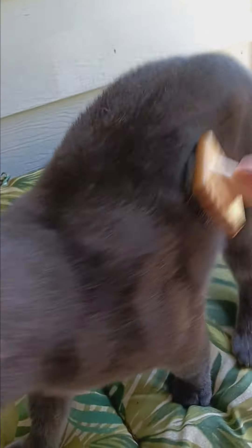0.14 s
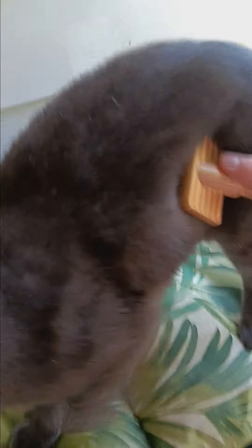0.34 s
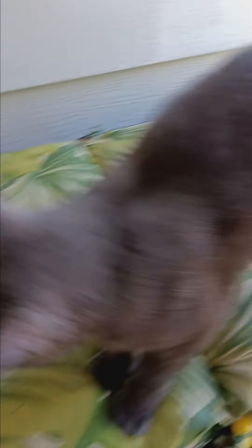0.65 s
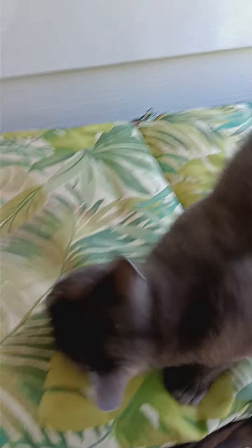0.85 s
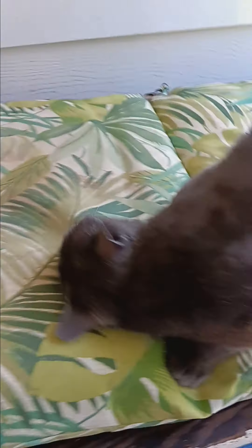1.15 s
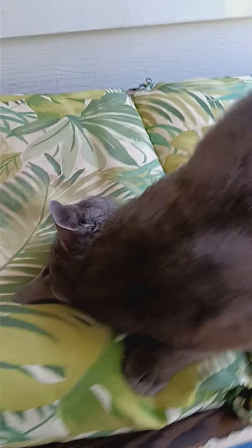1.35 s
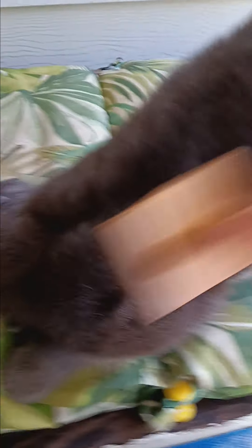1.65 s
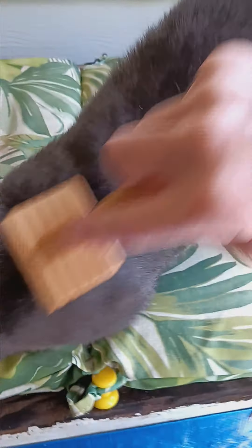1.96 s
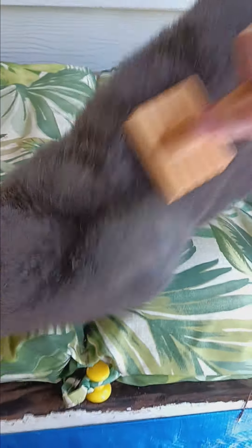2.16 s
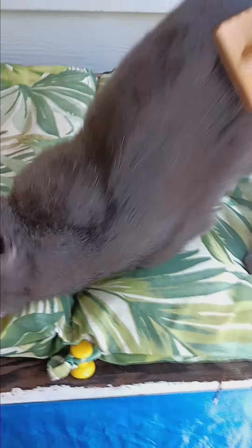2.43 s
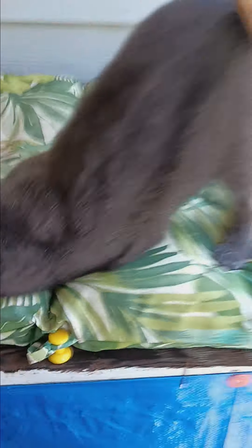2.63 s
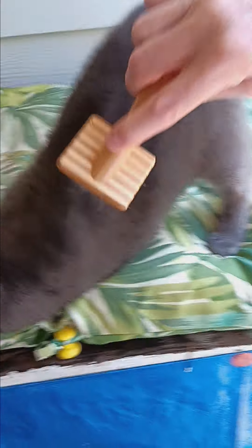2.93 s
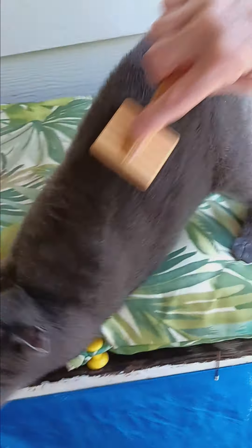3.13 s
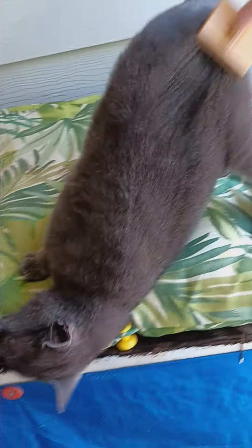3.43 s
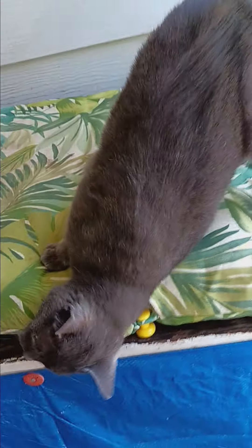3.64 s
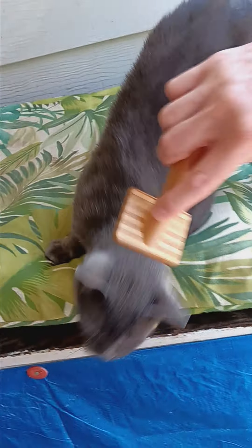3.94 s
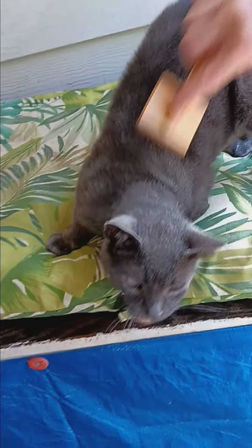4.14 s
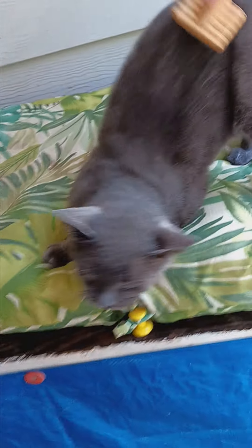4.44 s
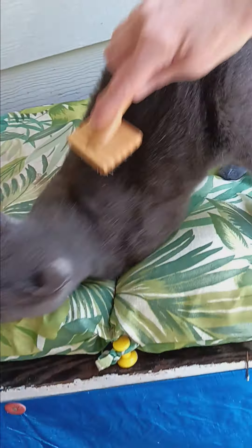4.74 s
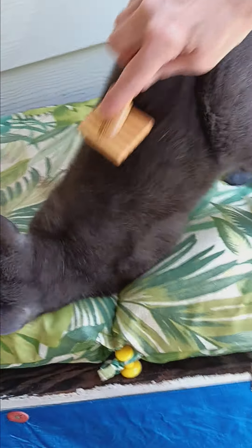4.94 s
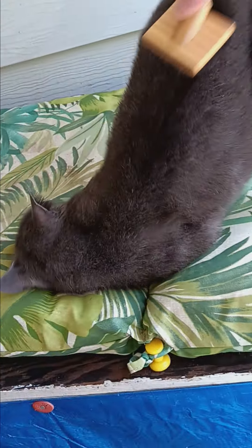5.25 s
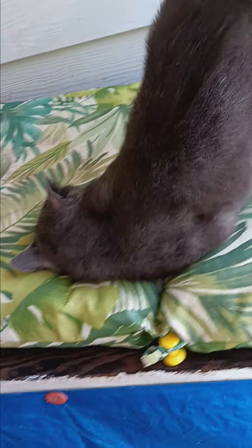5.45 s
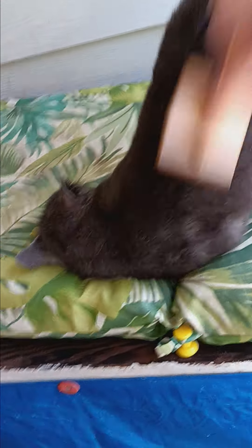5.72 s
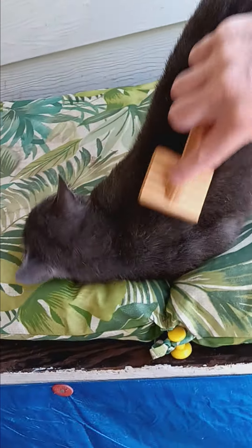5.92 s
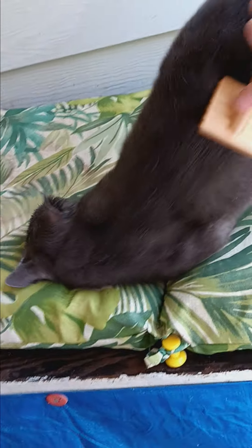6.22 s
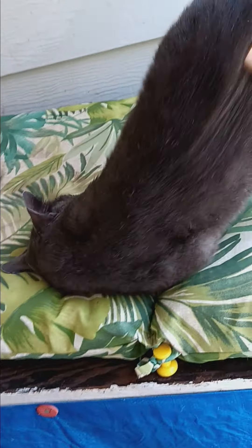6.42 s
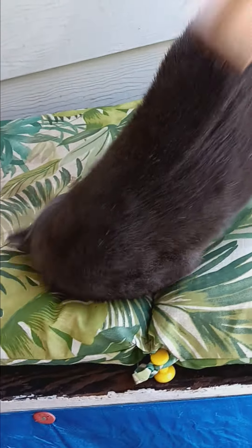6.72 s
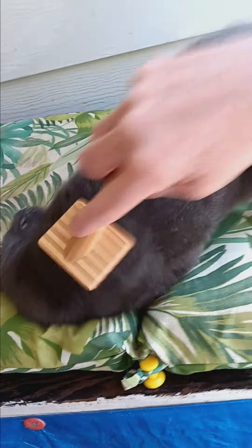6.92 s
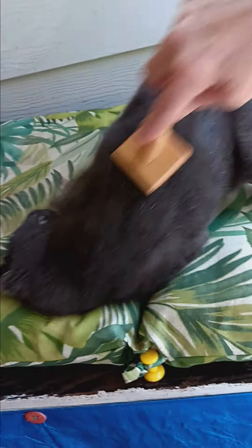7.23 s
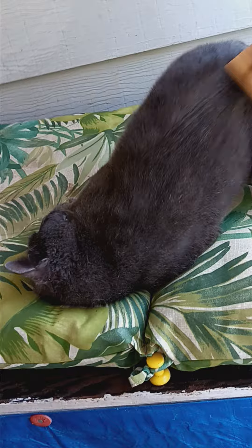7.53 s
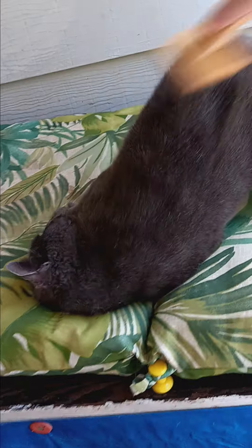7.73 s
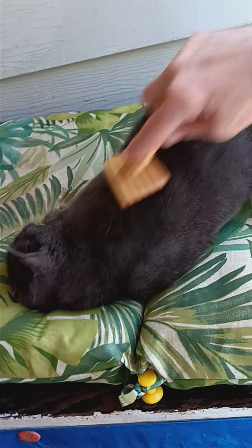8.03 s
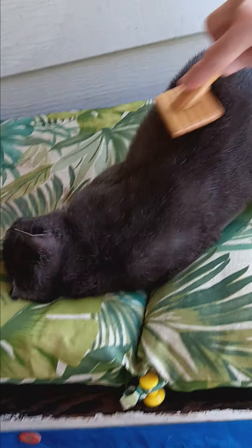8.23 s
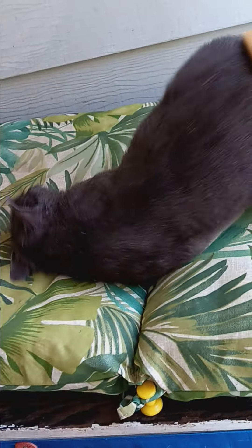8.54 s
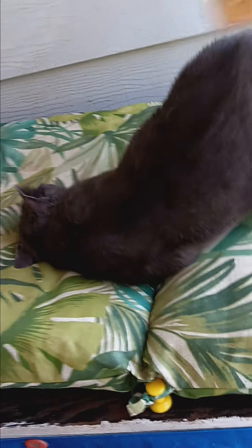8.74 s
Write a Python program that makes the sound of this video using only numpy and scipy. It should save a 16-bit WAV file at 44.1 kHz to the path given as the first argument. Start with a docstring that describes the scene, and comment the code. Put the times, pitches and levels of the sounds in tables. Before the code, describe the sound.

Outdoors on a porch, several crickets chirp high and steadily from start to finish, over a distant insect chorus and a faint, uneven rumble of air. Close to the hand-held microphone, a pin brush slips lightly through a cat's fur, making soft scratches and small clicks as the pins catch. At about 2.1 seconds a sharp tap, the loudest sound, briefly shakes the bench. The hardest, raspiest strokes follow until nearly 3 seconds. Just after 3 seconds a katydid joins with thin, very high, quickly repeated double pulses that continue to the end. Gentler strokes come around 3.4, 4.4, 5.2 and 6.2 seconds, with scattered ticks. Near 6.9 seconds a second, lighter tap rattles the bench, followed by a firmer, clicking stroke around 7.4 seconds. Soft brushing carries on among the insects until the end, just before 9 seconds.

```python
"""A cat is brushed on a porch, close to a hand-held phone whose left port is dull and a little late.
From the start, low air rumbles under the roof, field crickets chirp over a far insect chorus, and a
hollow-backed plastic pin brush slips lightly through the fur. At 2.1 s a tap shakes the bench and
the hardest strokes follow. Just after 3 s a katydid joins in, two wing strokes to a call.
Another tap rattles the bench near 6.9 s, and softer brushing carries on to the end."""
import sys
import numpy as np
from scipy import signal
from scipy.fft import rfft, irfft, next_fast_len
from scipy.io import wavfile
from scipy.ndimage import map_coordinates

SR = 44100
rng = np.random.default_rng(int(sys.argv[2]) if len(sys.argv) > 2 else 0)


def wav_record(signal):
    """Record a signal, one row per channel, as 16-bit PCM in the file named by sys.argv[1]."""
    frames = np.transpose(np.atleast_2d(signal))
    bounded = np.clip(frames, -1, 1)
    # unit amplitude maps onto the largest positive 16-bit level
    quanta = np.round(bounded * 32767).astype(np.int16)
    wavfile.write(sys.argv[1], SR, quanta)


N = 391166
TIME = np.arange(N) / SR


def amp(db):
    return 10 ** (np.asarray(db) / 20)


def unit(x):
    return x / np.sqrt(np.mean(x ** 2) + 1e-20)


def panned(db):
    """Left and right gains, the left db above the right."""
    return amp(np.array([[.5], [-.5]]) * db)


def along(points, hz, column=1):
    """One column of a frequency table, read on a log axis."""
    columns = np.transpose(points)
    return np.interp(np.log(hz + 1), np.log(columns[0] + 1), columns[column])


def curves(rows):
    """One value per sample for each column after the time."""
    times, *columns = np.transpose(rows)
    return [np.interp(TIME, times, column) for column in columns]


def wobble(rate):
    """A smooth random curve, rate knots a second."""
    return map_coordinates(rng.standard_normal(int(N * rate / SR) + 4), [TIME * rate])


def filtered(x, response):
    """x times a complex response of frequency."""
    size = next_fast_len(N + SR // 2)
    return irfft(rfft(x, size) * response(np.fft.rfftfreq(size, 1 / SR)), size)[..., :N]


def mode(hz, width_hz):
    """The response of one resonance."""
    return lambda f: 1j * f * width_hz / (hz * hz - f * f + 1j * f * width_hz)


def rung(x, hz, width_hz):
    """x through a resonance applied twice, rms 1."""
    return unit(filtered(x, lambda f: mode(hz, width_hz)(f) ** 2))


def sliding(x, hz, width_hz):
    """x through a steep triple resonance whose pitch and width move, at even power, rms 1."""
    f, t, spectra = signal.stft(x, SR, nperseg=512, noverlap=384)
    now = np.minimum((t * SR).astype(int), N - 1)
    gain = abs(mode(hz[now], width_hz[now])(f[:, None])) ** 3 / np.sqrt(width_hz[now])
    return unit(signal.istft(spectra * gain, SR, nperseg=512, noverlap=384)[1][:, :N])


def noise_pair(likeness):
    """Left and right white noise, as alike as the (f/Hz, likeness) points say."""
    angle = lambda f: np.arccos(np.clip(along(likeness, f), 0, 1)) / 2
    weights = lambda f: np.array([np.cos(angle(f)), np.sin(angle(f))])
    mid, side = filtered(rng.standard_normal((2, N)), weights)
    return np.array([mid + side, mid - side])


# Air in two hollows under the roof: t/s, deep level/dB, upper level/dB
ROOF_RUMBLE = [(0.0, -62, -61), (0.15, -54.5, -63), (0.57, -66, -70.5), (0.74, -44.5, -44),
               (0.79, -43.5, -58.5), (1.01, -67.5, -57), (1.14, -47, -73), (1.23, -79, -73),
               (1.31, -51.5, -46.5), (1.43, -73, -52.5), (1.5, -56.5, -64), (1.95, -58, -65),
               (2.05, -53, -62), (2.1, -47, -32.5), (2.17, -47.5, -59), (2.35, -57, -71), (2.69, -58, -47),
               (2.86, -68, -69), (2.91, -50.5, -60), (3.26, -63, -55.5), (3.43, -69, -69.5),
               (3.58, -43.5, -60), (4.1, -64, -64), (4.37, -45, -63.5), (4.62, -64, -69), (4.69, -49, -73),
               (4.86, -69, -53), (4.94, -51, -66), (5.01, -60.5, -71), (5.61, -55, -74), (5.63, -66, -68),
               (7.24, -56, -69), (7.26, -46.5, -62), (7.36, -70.5, -66.5), (7.86, -50.5, -74),
               (8.05, -64, -60), (8.13, -46.5, -54.5), (8.3, -58.5, -68), (8.52, -45, -53),
               (8.57, -48, -40.5), (8.67, -54, -65), (8.75, -46, -43), (8.82, -69, -64), (8.87, -53, -64)]
# Hiss from far off: f/Hz, density/dB per Hz
FAR_HISS = [(30, -88), (150, -92), (300, -95), (500, -100), (900, -98.5), (1300, -100), (1750, -99),
            (2300, -110), (3200, -114), (4300, -116), (5300, -111), (7600, -119), (10000, -118),
            (15000, -118)]
# How alike the porch sounds at the two microphone ports: f/Hz, likeness/0-1
PORT_LIKENESS = [(60, 0.97), (250, 1), (450, 0.3), (700, 0.096), (1000, 0.26), (3000, 0.037), (15000, 0.21)]


def air():
    """Far hiss, and low air that booms with chance swells in two hollows of the porch."""
    deep_db, upper_db = curves(ROOF_RUMBLE)
    deep = amp(deep_db + 3 * wobble(rate=9))
    upper = amp(upper_db + 4 * wobble(rate=9))
    hiss = np.sqrt(SR / 2) * filtered(noise_pair(PORT_LIKENESS), lambda f: amp(along(FAR_HISS, f)))
    hiss *= amp(1.3 * wobble(2.865))
    deep_boom = deep * rung(noise_pair(PORT_LIKENESS), hz=58.4, width_hz=32.2)
    upper_boom = upper * rung(noise_pair(PORT_LIKENESS), hz=123.7, width_hz=27.0)
    return hiss + deep_boom + upper_boom


# The high band of insects in the distance: t/s, relative level/dB
CHORUS_LEVEL = [(0, -69), (.22, -73), (.3, -95), (.9, -82), (1.5, -79.5), (2.3, -81), (2.6, -75.5),
                (3.5, -83), (4.5, -78), (4.86, -65), (5.16, -72.5), (6.05, -70.5), (6.65, -75), (7.5, -90),
                (8.3, -75), (8.6, -99), (8.87, -90)]
# Distant trills: f/Hz, width/Hz, level/dB, left gain/dB, wavering/dB
FAR_TRILLS = [(3627, 260, -89, -3, 3.5), (5830, 200, -84, -4, 2.5), (6050, 530, -83, -0.5, 3.5),
              (6610, 200, -86, -5, 2.5)]


def far_chorus():
    """Many far insects blur into a broad wavering band over a few unbroken trills."""
    band = rung(noise_pair([(9000, 0.38)]), hz=9910, width_hz=1200)
    out = amp(curves(CHORUS_LEVEL)[0] - 5 + 2.5 * wobble(13)) * band * amp([[-8], [0]])
    for hz, width, db, left_db, waver_db in FAR_TRILLS:
        level = amp(db + waver_db * wobble(2.41))
        out += level * rung(noise_pair([(5000, 0.22)]), hz, width) * amp([[left_db], [0]])
    return out


# Cricket tones around the porch, one a row: f/Hz, rate/chirps per s, first chirp t/s
CRICKET_CHIRPS = [(5790, 5.125, .045), (6020, 5.574, .159), (6290, 5.865, .035), (6550, 6.135, .052),
                  (6860, 6.135, .052), (7350, 7.76, .097)]
# The same tones at the microphone: width/Hz, sounding share of the period, left gain/dB,
# level/dB, weight of CRICKET_PICKUP, drift/dB per s
CRICKET_TONES = [(57.4, 0.6, -3.5, -66, 1.45, -0.51), (70, 0.51, -2, -68.5, 0.84, -0.35),
                 (89.5, 0.39, -11, -69, 1.3, -0.58), (79, 0.56, -8.5, -70, 0.94, -0.43),
                 (100, 0.32, 5, -79.5, .9, -0.66), (50, 0.21, -3, -81, .3, 0.1)]
# How they come through as hand and phone move: t/s, low pair level/dB, higher tones level/dB
CRICKET_PICKUP = [(0, 0, -2), (.4, 1.5, 3), (.7, 5.5, 0), (1.15, -2, -3), (1.5, 1.5, 3.5), (2, -6, -7),
                  (2.4, 6.5, 3.5), (2.8, -9, -3), (3.15, 6, 7.5), (3.6, -3, 0), (4.05, -3, -5.5),
                  (4.4, -10, -6), (4.75, 3, 4), (5.25, -8.5, -5.5), (5.8, 7, -3.5), (6.3, -7, -0.5),
                  (6.8, 1, 0), (7.25, -5.5, 0), (7.8, 6, 2), (8.4, -7, -6), (8.8, 2.5, 3)]


def crickets():
    """Five crickets chirp at their own pace; the 6550 Hz one has a fainter side tone at 6860 Hz."""
    low_db, high_db = curves(CRICKET_PICKUP)
    out = 0
    for (hz, rate, first), tone_row in zip(CRICKET_CHIRPS, CRICKET_TONES):
        width, share, left_db, db, weight, drift = tone_row
        phase = ((TIME - first) * rate + 0.059 * wobble(1.0) + .5) % 1 - .5
        chirps = 0.049 + np.cos(np.pi * np.clip(phase / share, -.5, .5))
        rasp = 1 + 0.062 * np.sin(2 * np.pi * 60 * TIME + 4 * wobble(35))  # wing strokes
        tone = sliding(noise_pair([(5000, 0.43)]), hz * (1 + 0.0027 * wobble(5.4)), np.full(N, width))
        pickup_db = weight * (high_db if hz > 6100 else low_db)
        level = amp(db + pickup_db + drift * TIME + 2.6 * wobble(rate))
        out += level * chirps * rasp * tone * amp([[left_db], [0]])
    return out


# One katydid, heard over the far chorus; calls fall evenly between rows: t/s, call number
KATYDID_PACE = [(3.14, 0), (3.66, 1), (4.27, 5), (4.99, 10), (5.37, 13), (5.93, 17), (6.91, 24), (7.48, 28),
                (7.649, 29), (8.21, 33), (8.82, 37)]
# Its level at the microphone: t/s, level/dB
KATYDID_LEVEL = [(3, -78), (4, -70.5), (4.4, -74), (4.75, -69.5), (5.35, -77.5), (5.9, -66), (6.4, -72.5),
                 (6.75, -67), (6.95, -74), (7.2, -67), (7.45, -72), (7.95, -65.5), (8.4, -75.5),
                 (8.75, -68.5)]
# Its wings' base pitch: t/s, f/Hz
KATYDID_PITCH = [(3, 9450), (5, 9480), (6, 9450), (6.7, 9560), (7.6, 9640), (8.87, 9620)]
# Closing and opening wing stroke: pitch ratio, delay/s
WING_STROKES = [(1, 0), (.968, .06)]
# Tone of those two strokes: width/Hz, a third of the length/s, left gain/dB, level/dB
WING_TONES = [(375, 0.036, 1, 0), (278, 0.04, -14, -3)]


def katydid():
    """Two wing strokes a call, the second lower; the teeth give each a fast flutter."""
    times, numbers = np.transpose(KATYDID_PACE)
    calls = np.interp(np.arange(numbers[-1] + 1), numbers, times)
    teeth = 1 + 0.25 * np.sin(2 * np.pi * 190 * TIME + 3 * wobble(32))
    level = amp(curves(KATYDID_LEVEL)[0])
    out = 0
    for (ratio, delay), (width, third_s, left_db, db) in zip(WING_STROKES, WING_TONES):
        crests = np.zeros(N + SR)
        crests[((calls + delay) * SR).astype(int)] = amp(db + 2.5 * rng.standard_normal(len(calls)))
        swell = signal.fftconvolve(crests, np.hanning(int(3 * third_s * SR)), "same")[:N]
        hz = ratio * curves(KATYDID_PITCH)[0] + 60 * np.tanh(unit(swell)) - 30  # lifts with each stroke
        tone = sliding(noise_pair([(9000, 0.87)]), hz, np.full(N, width))
        out += level * swell * teeth * tone * amp([[left_db], [0]])
    return out


def porch_echo(x):
    """A short bright answer from wall and roof."""
    t = np.arange(SR // 4) / SR
    tail = rng.standard_normal((2, len(t))) * amp(-60 * t / 0.055) * (t > .003)
    return signal.fftconvolve(x, tail / np.linalg.norm(tail[0]), axes=1)[:, :N]


# The porch bench after a tap: t/s, level/dB, time to fall 60 dB/s
BENCH_SHUDDERS = [(2.101, -38.5, 0.23), (4.7, -60, 0.31), (6.886, -52, 0.33)]


def bench_shudder():
    """Loose boards rattle on for a moment."""
    level = sum(amp(db - 60 * abs(TIME - s) / t60) * (TIME > s) for s, db, t60 in BENCH_SHUDDERS)
    return level * rung(noise_pair(PORT_LIKENESS), hz=318, width_hz=143) * panned(1.9)


# Pins catching and brush taps, close to the microphone:
# t/s, relative level/dB, knock trim/dB, left-right/dB, ping f/Hz
PIN_CATCHES = [(0.172, -45.5, -15, 3, 1900), (0.9431, -50, -7.5, 1, 1660), (1.025, -40, -31, 2, 1820),
               (1.047, -41, -35, 7, 1840), (1.2238, -33.5, -31, 14, 3300), (1.4375, -52, -12, 9, 2020),
               (1.6581, -42.5, -19, 1, 6600), (1.7402, -41.5, -10.5, 19.5, 1260),
               (1.848, -43.5, -21, 5, 2240), (1.923, -40, -20, -3, 1560), (2.072, -39, -16, 13, 9950),
               (2.0871, -18, -4.5, -14, 1140), (2.1246, -34.5, -5, 13, 1740), (2.152, -29, -28, 14, 1600),
               (2.17, -27, -21, -7, 1600), (2.7106, -32, -57, 7, 2090), (3.348, -32, -38, 4, 4330),
               (3.395, -32.5, -42, 11, 1700), (3.4097, -32.5, -41, 11, 1660),
               (4.121, -38.5, -32, -3.5, 9600), (4.4263, -53, -21, 4, 2580), (4.786, -51.5, -12, 1, 6340),
               (5.379, -50, -20, 3.5, 1650), (6.437, -41, -37, -5, 1590), (6.8812, -23.5, -27, -7.5, 2260),
               (6.889, -26.5, -33, 5, 3250), (6.8983, -34, -27, -2, 1290), (7.313, -39, -35, 10, 4360),
               (7.3928, -39, -42, 12, 1530), (7.412, -38, -44, 22, 1610), (7.422, -34, -38, 19.5, 5200),
               (7.4306, -49, -27, 26, 1750), (8.1314, -43, -23, 8, 1670), (8.4033, -37.5, -26, 1, 1160),
               (8.443, -41.5, -31, 5, 1770), (8.48, -53, -25, 3.0, 1730)]
# Modes of the knocked bench: f/Hz, width/Hz, level/dB
BENCH_MODES = [(127, 45, -38), (199, 122, 3), (316, 68, -3.5), (664, 320, -16), (1125, 200, -9.5)]


def catches_and_taps():
    """Each catch is a short crack with a ping of its own pitch; taps also knock the bench."""
    cracks, blows = np.zeros((2, N + SR)), np.zeros(N)
    t = np.arange(600) / SR
    attack = 1 - np.exp(-t / 0.00078)
    for s, db, knock_db, pan_db, hz in PIN_CATCHES:
        noise = rng.standard_normal(len(t)) + 2.7 * rng.standard_normal((2, len(t)))
        burst = amp(-60 * t / 0.009) * noise
        snap = 0.49 * signal.lfilter(*signal.iirpeak(hz, 1.2, SR), burst)  # low pings, dull cracks
        ping = 0.5 * amp(-60 * t / 0.031) * np.sin(2 * np.pi * hz * t)
        start = round(s * SR)
        cracks[:, start:start + len(t)] += amp(db - 3.0) * panned(pan_db) * (snap + ping) * attack
        blows[round((s + .0012) * SR)] = amp(db + knock_db + 40.5)
    wood = lambda f: sum(amp(db) * mode(hz, width)(f) for hz, width, db in BENCH_MODES)
    return cracks[:, :N] + panned(1.2) * filtered(blows, wood)


# Fine modes of the pin bed: f/Hz, width/Hz, relative level/dB
PIN_BED_MODES = [(1660, 22, -1.5), (1917, 29, -2), (2390, 49, -3.5), (2722, 21, -0.5), (2950, 19, -2.5),
                 (3390, 40, 0), (4180, 19, -2), (4410, 31, -12), (4710, 30, -8), (4980, 26, -6),
                 (5230, 28, -14), (5700, 28, -0.5)]


def pin_friction():
    """Pins slip through the fur in tiny uneven jerks, coloured by the pin bed."""
    slips = (rng.random(N) < 700 / SR) * amp(2.3 * rng.standard_normal(N))  # about 700 a second
    jerks = 1.25 + 0.38 * unit(signal.lfilter([1], [1, -.95], slips))
    rub = noise_pair([(500, 0.13), (10000, 0.053)]) * jerks * amp(1.76 * wobble(40))
    pin_bed = lambda f: 1 + sum(amp(db + 0.5) * mode(hz, width)(f) for hz, width, db in PIN_BED_MODES)
    return filtered(rub, pin_bed)


def swells(rows, db_column, rest_db):
    """Amplitude of strokes that rise to a crest and fall away, over light contact that comes and goes."""
    fade_db, flat_top = 26.5, 1.68  # lost over a rise or a fall; higher holds the crest longer
    power = amp(2.023 * (rest_db + 4 * wobble(7)))
    for row in rows:
        crest, rise, fall = row[:3]
        span = slice(max(int((crest - 2 * rise) * SR), 0), int((crest + 2 * fall) * SR))
        t = TIME[span] - crest
        from_crest = np.where(t < 0, -t / rise, t / fall)
        power[span] += amp(2 * (row[db_column] - fade_db * from_crest ** flat_top))
    return np.sqrt(power)


# Strokes through the fur, close to the microphone: crest t/s, rise/s, fall/s,
# relative level/dB of back, pad and fur, back f/Hz, pad f/Hz
FUR_STROKES = [(.03, 0.027, 0.029, -64, -76, -76, 1490, 4970), (.18, 0.077, .05, -64, -84, -80, 1780, 4730),
               (.48, 0.035, 0.09, -70, -68.5, -74, 1650, 3820), (.89, 0.18, .08, -67, -91, -93, 1500, 4500),
               (1.06, 0.092, 0.095, -59, -67.5, -67.5, 1880, 3600),
               (1.233, 0.034, 0.083, -54, -66, -66, 1780, 3730),
               (1.42, 0.047, 0.099, -65, -98, -102, 1840, 4520),
               (1.74, 0.012, 0.015, -50, -73, -81, 1630, 4160),
               (1.86, 0.12, 0.15, -78, -81, -75.5, 1620, 4420),
               (1.96, 0.052, 0.044, -61, -68, -77, 1530, 4500),
               (2.09, 0.02, 0.077, -41.5, -54, -55.5, 1430, 4700),
               (2.157, 0.025, 0.056, -42.5, -63, -53.5, 1590, 4630),
               (2.24, 0.14, 0.13, -58, -47, -58, 1850, 4270),
               (2.33, 0.084, 0.12, -59, -73, -73.5, 1800, 4230),
               (2.47, 0.037, 0.072, -55, -82, -73, 1890, 4660),
               (2.555, 0.05, 0.041, -63, -74, -72, 1740, 4000),
               (2.717, 0.013, 0.1, -41.5, -38.5, -46.5, 2030, 4500),
               (2.756, 0.033, .07, -39, -37.5, -49, 1870, 4730),
               (2.8, 0.06, .12, -58.5, -50.5, -61, 2090, 4630),
               (3.11, 0.053, 0.036, -51, -68, -90, 1500, 3820),
               (3.36, 0.054, 0.12, -61, -59, -71, 1640, 4400),
               (3.409, 0.036, 0.029, -48, -46, -77, 1700, 4200),
               (4.131, 0.017, 0.077, -57, -68, -80, 1390, 4030),
               (4.25, 0.033, 0.075, -50.5, -76, -75.5, 1420, 4440),
               (4.47, 0.1, 0.069, -56.5, -95, -95, 2000, 4100),
               (4.8, .03, 0.025, -65, -70, -79, 1370, 5000),
               (5.1, 0.11, 0.24, -58.5, -64.5, -84, 1510, 4100),
               (5.22, 0.2, 0.17, -60.5, -68.5, -82, 1500, 4300),
               (5.365, 0.16, 0.038, -54, -62, -75.5, 1660, 4400),
               (5.77, 0.17, 0.25, -65, -92, -97, 1680, 4850), (5.93, 0.11, 0.11, -64, -82, -90, 1600, 4400),
               (6.08, 0.11, 0.15, -56.5, -68, -84, 1420, 4370),
               (6.17, 0.11, 0.091, -61, -69, -84, 1560, 4280),
               (6.25, 0.19, 0.087, -58.5, -68, -89, 1580, 4240),
               (6.35, 0.058, 0.098, -59, -69, -87, 1630, 4360),
               (6.455, .03, 0.025, -59, -59.5, -83, 1840, 4200),
               (6.76, 0.057, 0.096, -67.5, -84, -92, 1630, 4500),
               (6.885, 0.015, 0.094, -55, -59, -67.5, 1290, 4300),
               (7.15, 0.061, 0.041, -63, -79, -106, 1600, 4670),
               (7.265, .025, .07, -62, -57.5, -92, 1630, 4060),
               (7.325, 0.082, 0.065, -55, -50.5, -78, 1490, 4530),
               (7.39, 0.08, .06, -48, -58, -79, 1530, 4800),
               (7.425, 0.051, 0.054, -54, -52.5, -71, 1570, 4970),
               (8.15, 0.24, 0.24, -62, -73.5, -77.5, 1580, 4150),
               (8.42, 0.17, 0.059, -61, -69, -72.5, 1420, 4700),
               (8.484, 0.088, 0.022, -59, -63.5, -76, 1680, 4470),
               (8.7, .04, .04, -65, -95, -95, 1680, 4530), (8.8, 0.098, .04, -64, -90, -92, 1680, 4530)]
# Pins springing free and ringing: crest t/s, rise/s, fall/s, relative level/dB, f/Hz, base width/Hz
PIN_RELEASES = [(.03, 0.03, .04, -65, 2270, 450), (.48, 0.066, 0.033, -61, 2120, 450),
                (.9, 0.19, 0.088, -72, 2450, 450), (1.06, 0.12, 0.039, -56.5, 2130, 450),
                (1.23, 0.024, 0.045, -48.5, 3200, 450), (1.42, 0.052, 0.17, -68, 2200, 450),
                (1.74, .015, 0.022, -60, 2040, 450), (1.92, .12, 0.088, -72, 2720, 450),
                (2.09, .015, .06, -47, 2850, 480), (2.238, 0.062, 0.062, -43.5, 2520, 500),
                (2.56, 0.058, .11, -51, 2600, 605), (2.718, 0.012, 0.12, -40, 2780, 556),
                (3.11, .04, .04, -67, 2540, 500), (4.285, 0.022, .04, -53, 2600, 503),
                (4.33, 0.024, .04, -52.5, 2600, 450), (4.37, 0.022, .05, -54, 2580, 450),
                (4.46, 0.1, .11, -51, 2410, 547), (4.81, 0.066, 0.15, -65.5, 2400, 400),
                (6.09, 0.16, 0.12, -69, 2580, 350), (6.885, 0.018, 0.18, -56, 2380, 400),
                (7, 0.13, 0.23, -61, 2500, 220), (7.19, 0.39, 0.11, -60, 2640, 199),
                (7.34, 0.033, 0.056, -55, 2600, 450), (8.42, .07, 0.088, -67, 2460, 450)]
# The cushion takes a push: crest t/s, rise/s, fall/s, relative level/dB
CUSHION_PUSHES = [(1.25, .04, 0.053, -62), (1.74, .015, .03, -62), (1.96, 0.056, 0.039, -46),
                  (2.1, 0.034, 0.1, -45), (2.33, 0.076, 0.068, -66), (2.466, 0.027, .05, -64),
                  (3.36, .06, .05, -62), (4.1, .02, .03, -62), (4.8, .04, 0.022, -58),
                  (5.37, .08, 0.027, -62), (6.11, 0.058, .08, -60), (6.25, 0.15, 0.046, -59),
                  (6.885, .012, 0.21, -59.5), (8.42, 0.11, 0.047, -59)]
# Light contact between strokes: relative level/dB of cushion, back, pins, pad and fur
CONTACT_DB = [-71, -87, -82, -98, -98]
# Ringing parts, a row each for cushion, back, pins and pad: trim/dB, left-right/dB
BRUSH_PARTS = [(-3, -3.5), (-4, 3), (-4, 5), (-1, 0)]
# Hiss of the fur at close range: f/Hz, relative level/dB
FUR_SPECTRUM = [(1000, -35), (1500, -12), (2500, -0.5), (4500, 1), (7000, 5), (9000, 4), (12000, 1),
                (16000, -13)]
# Where the brush sits in front of the phone: t/s, left-right/dB
BRUSH_POSITION = [(.5, -2), (1.06, -0.5), (1.24, -2), (1.9, 0.5), (2.1, -0.5), (2.25, -1.5), (2.55, 2.5),
                  (2.75, -0.5), (3.1, -2.5), (3.4, -2.5), (4.3, 0), (5.2, -0.5), (6.1, 1.5), (6.45, -1),
                  (6.9, 2), (7.1, 2.5), (7.4, 3), (8.15, -1), (8.45, 0.5)]


def brush():
    """One friction makes the fur hiss and shakes cushion, hollow back, pins and pad at once."""
    cushion_db, back_db, pins_db, pad_db, fur_db = CONTACT_DB
    levels = [swells(CUSHION_PUSHES, 3, cushion_db), swells(FUR_STROKES, 3, back_db),
              swells(PIN_RELEASES, 3, pins_db), swells(FUR_STROKES, 4, pad_db)]
    fur = swells(FUR_STROKES, 5, fur_db)
    back_hz, pad_hz = curves(FUR_STROKES)[-2:]
    pins_hz, pins_width = curves(PIN_RELEASES)[-2:]
    pitches_hz = [np.full(N, 790), back_hz, pins_hz, pad_hz]
    widths_hz = [200, 323, pins_width, 920]
    damping = 1 + (amp(90) * fur) ** 0.17  # hard pressure damps and widens the ringing
    rub = pin_friction()
    out = amp(6.5) * fur * unit(filtered(rub, lambda f: amp(along(FUR_SPECTRUM, f))))
    for level, hz, width, (trim_db, pan_db) in zip(levels, pitches_hz, widths_hz, BRUSH_PARTS):
        ringing = sliding(rub, hz, width * damping)
        out += level * amp(trim_db + 1.5 * wobble(60)) * ringing * panned(pan_db)
    return out * panned(curves(BRUSH_POSITION)[0])


def scene():
    """Brush and bench close by, insects and air beyond; only catches and taps echo off the porch."""
    hits = catches_and_taps()
    close = brush() + hits + amp(-9) * porch_echo(hits) + bench_shudder()
    return close + crickets() + katydid() + far_chorus() + air()


# The phone's two microphone ports: f/Hz, left gain/dB, right gain/dB
MIC_PORTS = [(50.3, 3, 0), (185, 2.5, -3), (726, 2.5, -3.5), (1520, 5, -6), (2460, 1, -2.5), (4870, -1, 0),
             (6840, -4, 4.5), (7680, 1, -4.5), (9500, -3.5, 11), (10280, -19, 12.5), (11870, -24, 1.5),
             (14600, -29, 0.5)]


def record(dry):
    """Each port colours the sound, the left one lags, and nothing passes above the band limit."""
    lag_s, top_hz = 47 / SR, 15750
    left = lambda f: amp(along(MIC_PORTS, f, column=1)) * np.exp(-1j * np.pi * f * lag_s)
    right = lambda f: amp(along(MIC_PORTS, f, column=2)) * np.exp(1j * np.pi * f * lag_s)
    return filtered(dry, lambda f: np.array([left(f), right(f)]) * (f < top_hz))


dry = scene()
out = record(dry)
wav_record(out)
```